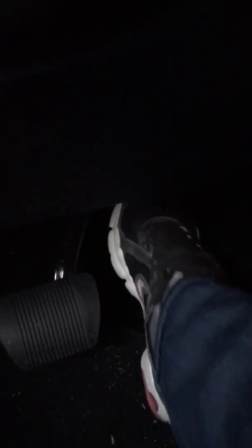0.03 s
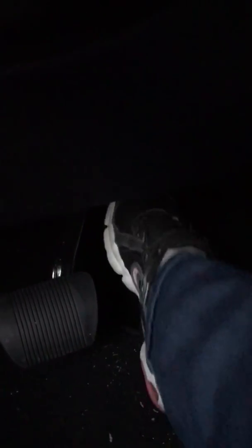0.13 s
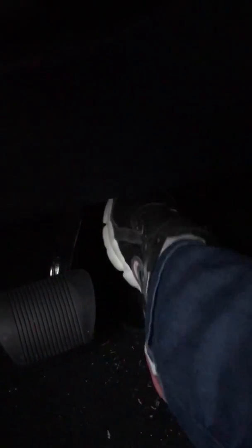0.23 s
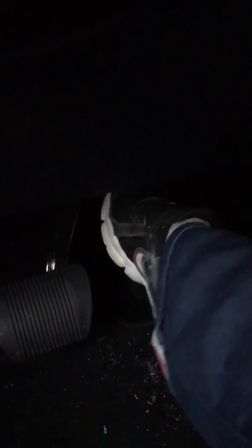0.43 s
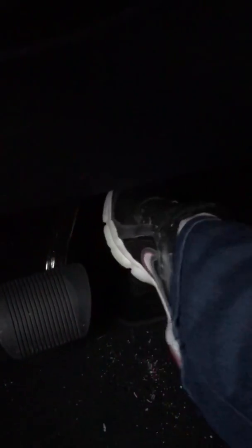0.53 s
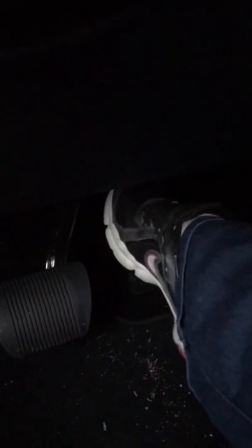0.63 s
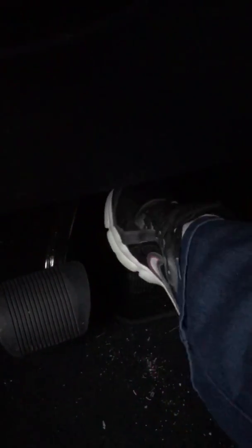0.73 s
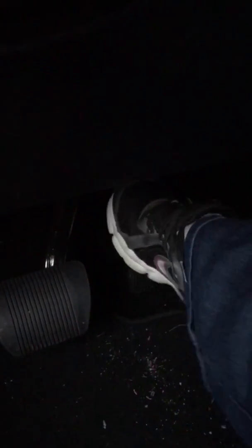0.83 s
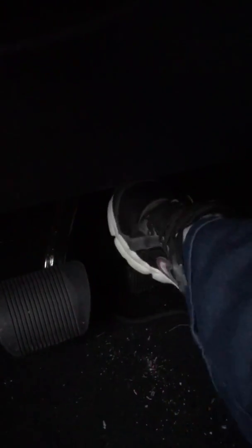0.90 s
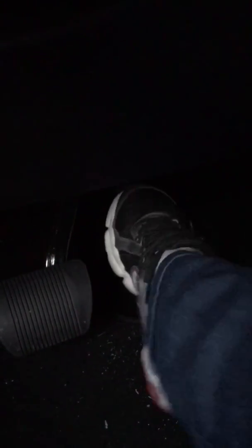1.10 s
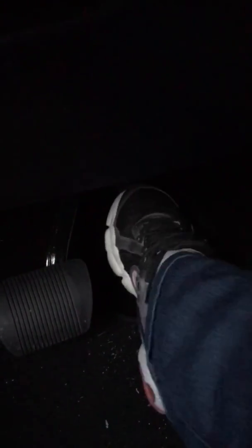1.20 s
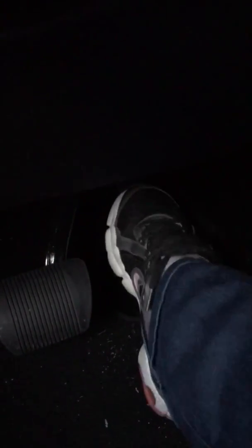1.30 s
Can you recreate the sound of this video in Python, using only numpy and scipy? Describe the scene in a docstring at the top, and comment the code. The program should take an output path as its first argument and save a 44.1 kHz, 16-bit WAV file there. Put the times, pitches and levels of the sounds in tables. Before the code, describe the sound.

One sharp, hollow clack of a released car pedal, then faint trouser rustle.

```python
"""A car pedal, let go by a shoe, snaps against its stop: one sharp click and a hollow knock as the
pedal and its mount ring, after which the cabin booms briefly. Trouser cloth and the sole rub softly
as the leg moves, with a few tiny ticks and thuds. Under it all lie a faint idle rumble and the hiss
of the microphone, with very faint high pips."""
import sys
import numpy as np
from scipy import signal
from scipy.fft import rfft, irfft, next_fast_len
from scipy.io import wavfile
from scipy.ndimage import map_coordinates

SR = 44100
rng = np.random.default_rng(int(sys.argv[2]) if len(sys.argv) > 2 else 0)


def dump_mix(stems):
    """Bounce the given channels to the path in sys.argv[1] as a 16-bit WAV at rate SR."""
    frames = np.atleast_2d(stems).T  # one column per channel
    limited = np.clip(frames, -1, 1)  # hard clip at full scale
    pcm = np.round(limited * 32767).astype(np.int16)
    wavfile.write(sys.argv[1], SR, pcm)


N = 59535


def amp(db):
    """Turn decibels into a factor to multiply by."""
    return 10 ** (np.asarray(db) / 20)


def filtered(x, response):
    """Scale each frequency in x by the factor response(hz)."""
    size = next_fast_len(N + 8192)
    return irfft(rfft(x, size) * response(np.fft.rfftfreq(size, 1 / SR)), size)[:N]


def noise(colour):
    """Noise of strength (rms) 1, coloured by rows of (frequency [Hz], relative level [dB])."""
    row_hz, db = np.transpose(colour)
    white = rng.standard_normal(N)
    x = filtered(white, lambda hz: amp(np.interp(np.log(hz + 1), np.log(row_hz), db)))
    return x / x.std()


def since(start):
    """Seconds since start, zero before it."""
    return np.maximum(np.arange(N) / SR - start, 0)


def burst(start, rise_s, fade_s):
    """A loudness curve that rises quickly, then dies away by 60 dB every fade_s seconds."""
    t = since(start)
    return (1 - np.exp(-t / rise_s)) * np.exp(-np.log(1000) * t / fade_s)


def ring(start, hz, rise_s, fade_s):
    """One fading tone of something that has been struck."""
    return burst(start, rise_s, fade_s) * np.sin(2 * np.pi * hz * since(start))


def swell(centre_s, half_length_s):
    """A bell-shaped loudness curve that comes and goes smoothly."""
    return np.exp(-.5 * ((np.arange(N) / SR - centre_s) / half_length_s) ** 2)


def wobble(rate):
    """A smooth curve through `rate` random values a second."""
    return map_coordinates(rng.standard_normal(N), [np.arange(N) * rate / SR])


def hiss(level_db=-73.5):
    """The microphone hisses steadily."""
    # tone colour of the hiss (frequency [Hz], relative level [dB])
    colour = [(100, -7), (1000, -6), (3000, 2), (7000, -0.5), (10700, -3), (12400, 3), (13500, 1),
              (15500, -1)]
    return amp(level_db) * noise(colour)


def pips(count=44, per_second=34, spread_hz=260, spread_db=3, jitter_s=0.0024):
    """The electronics give off very faint high pips, uneven in timing, pitch and strength."""
    # the two rows of pips (typical pitch [Hz], typical level [dB])
    pitches = [(12000, -73), (9600, -79)]
    out = np.zeros(N)
    for hz, db in pitches:
        for k, (late, detune, strength) in enumerate(rng.standard_normal((count, 3))):
            centre_s = k / per_second + jitter_s * late
            loudness = amp(db + spread_db * strength) * swell(centre_s, half_length_s=0.0024)
            out += loudness * np.sin(2 * np.pi * (hz + spread_hz * detune) * since(0))
    return out


def idle(level_db=-65.5):
    """The idling car rumbles, low and steady."""
    # tone colour of the rumble (frequency [Hz], relative level [dB])
    colour = [(15, -11), (30, -23), (48, 4), (70, -1.5), (120, -5.5), (200, -9.5), (400, -15.5),
              (800, -21.5), (2000, -31), (6000, -53)]
    return amp(level_db) * noise(colour)


def cloth(grain_db=2, grains_per_second=250):
    """The trouser leg rubs, louder as it moves faster; catching fibres make it slightly grainy."""
    # strength of the rubbing (time [s], level [dB])
    rubbing = [(0, -62), (.07, -72), (0.131, -68), (.21, -72.5), (.35, -70.5), (.44, -77.5), (.53, -69.5),
               (.61, -67), (.68, -69.5), (0.737, -76), (.81, -74), (.87, -71), (.96, -67), (1.05, -71),
               (1.118, -66.5), (1.2, -70.5), (1.27, -77), (1.35, -107)]
    # tone colour of the cloth (frequency [Hz], relative level [dB])
    colour = [(100, -15), (300, 3), (700, 9), (1300, 4), (2400, -1.5), (3800, 1), (6000, -3.5),
              (10000, -6.5), (15000, -22.5)]
    times, db = np.transpose(rubbing)
    level_db = np.interp(np.arange(N) / SR, times, db)
    return amp(level_db + grain_db * wobble(grains_per_second)) * noise(colour)


def sole(scuff_db=-63):
    """The sole creaks faintly as it slides on the pedal, then gives a brighter scuff as it settles."""
    # creaks (middle [s], half length [s], level [dB])
    slides = [(0.916, 0.012, -67), (0.967, 0.0086, -65)]
    # tone colour of the creaks (frequency [Hz], relative level [dB])
    creak_colour = [(150, -27), (400, -3.5), (560, -5), (690, 2), (830, -19), (1300, -14), (3000, -38)]
    # tone colour of the scuff (frequency [Hz], relative level [dB])
    scuff_colour = [(300, -23), (1200, 10), (2700, -0.5), (3700, 11), (4900, -6), (6500, 7), (8300, -5),
                    (10000, -14), (15000, -4)]
    creaks = sum(amp(db) * swell(centre, half) for centre, half, db in slides)
    scuff = amp(scuff_db) * swell(centre_s=1.118, half_length_s=0.019)
    return creaks * noise(creak_colour) + scuff * noise(scuff_colour)


def thuds():
    """The foot bumps the pedal softly, each bump a short low tone."""
    # bumps (time [s], level [dB], pitch [Hz])
    bumps = [(.001, -45, 60), (0.028, -44, 66.5), (.817, -55.5, 66), (1.063, -59, 98)]
    return sum(amp(db) * ring(start, hz, rise_s=0.0014, fade_s=0.15) for start, db, hz in bumps)


def ticks():
    """Shoe and pedal make tiny ticks: short bursts of noise, some duller than others."""
    # ticks (time [s], level before dulling [dB], dull above [Hz])
    touches = [(0.0095, -50, 14000), (.0355, -46.5, 2500), (0.7657, -63, 4500), (0.7848, -56, 5960),
               (0.8214, -57.5, 10000)]
    # tone colour before dulling (frequency [Hz], relative level [dB])
    colour = [(300, 7.5), (800, 1), (1400, 5.5), (3000, -2), (6000, 2), (9000, -5), (15000, -7)]
    out = np.zeros(N)
    for start, db, dull_hz in touches:
        tick = amp(db) * burst(start, rise_s=0.00017, fade_s=0.016) * noise(colour)
        out += filtered(tick, lambda hz: 1 / np.hypot(1, hz / dull_hz))
    return out


def cabin(hit_s, boom_delay_s=0.0211, tail_db=-43):
    """The cabin answers the pedal's blow with a low boom and a dull tail of echoes."""
    # low tones at which the cabin rings (pitch [Hz], level [dB], time to fade by 60 dB [s])
    tones = [(44.5, -43, 0.56), (64.2, -50.5, 0.69), (114, -50.5, 0.7)]
    # tone colour of the tail (frequency [Hz], relative level [dB])
    tail_colour = [(30, -27), (90, -3), (170, -1.5), (300, -6.5), (450, -29), (700, -29.5), (1500, -37.5),
                   (4000, -84)]
    boom_s = hit_s + boom_delay_s
    boom = sum(amp(db) * ring(boom_s, hz, rise_s=0.012, fade_s=fade) for hz, db, fade in tones)
    tail = amp(tail_db) * burst(hit_s, rise_s=0.005, fade_s=0.41) * noise(tail_colour)
    return boom + tail


def pedal(hit_s, snap_db=-28.5, chatter_db=-40, rise_s=0.00065):
    """The pedal hits its stop: a snap with quick rebounds, a short chatter and a ringing knock."""
    # tones at which pedal and mount ring (pitch [Hz], level [dB], time to fade by 60 dB [s])
    tones = [(123.3, -43, 0.24), (191, -28, 0.088), (227.1, -45, 0.33), (312.3, -24, 0.085),
             (345.8, -20, 0.045), (472.5, -23, 0.032), (683, -39, 0.061), (889, -37, 0.044),
             (982.5, -30, 0.045), (1409, -33.5, 0.029), (1533, -30.5, 0.014), (1695, -38, 0.024),
             (2027, -39.5, 0.033), (2244, -41, 0.027), (5685, -41.5, 0.02), (5820, -51, 0.017),
             (6900, -43, 0.022), (7120, -49, .028)]
    # tone colour of the snap (frequency [Hz], relative level [dB])
    snap_colour = [(400, -3), (1000, -22), (1700, -1.5), (2500, -12), (3500, -13), (4700, -8), (5600, 6.5),
                   (7000, -6), (9300, -5.5), (11000, -25), (15000, -20)]
    # tone colour of the chatter after it (frequency [Hz], relative level [dB])
    chatter_colour = [(300, -14), (900, 3.5), (1600, 6), (2300, 0), (2900, -10), (4000, -5), (4800, -11),
                      (5700, -9.5), (7000, -11), (8200, -12.5), (10500, -21.5), (15000, -25)]
    lag_cycles, rise_cycles = 0.68, 0.66  # low tones arrive later and build up more slowly
    knock = sum(amp(db) * ring(hit_s + lag_cycles / hz, hz, rise_cycles / hz, fade)
                for hz, db, fade in tones)
    bounce_s, loss_db = 0.00203, 4.5  # the pedal rebounds on its stop, weaker each time
    snaps = sum(amp(snap_db - k * loss_db) * burst(hit_s + k * bounce_s, rise_s, fade_s=0.0033)
                for k in range(3))
    chatter = amp(chatter_db) * burst(hit_s, rise_s, fade_s=0.048)
    return knock + snaps * noise(snap_colour) + chatter * noise(chatter_colour)


def scene(hit_s=0.2394):
    """All the sounds meet at one microphone above the pedals."""
    return (pedal(hit_s) + cabin(hit_s) + ticks() + thuds() + sole() + cloth()
            + idle() + hiss() + pips())[None]


def record(dry):
    """The recorder drops the deepest bass and the highest treble."""
    low_cut_hz, top_hz = 26, 15700
    bass_cut = signal.butter(2, low_cut_hz, "highpass", fs=SR, output="sos")
    x = signal.sosfilt(bass_cut, dry[0])
    return filtered(x, lambda hz: hz < top_hz)[None]


dry = scene()
out = record(dry)
dump_mix(out)
```